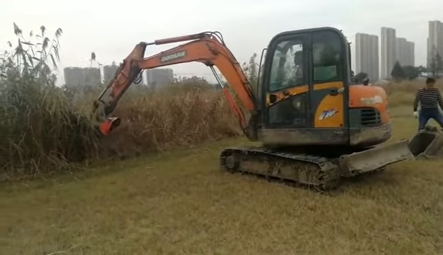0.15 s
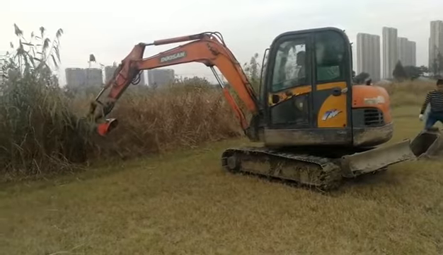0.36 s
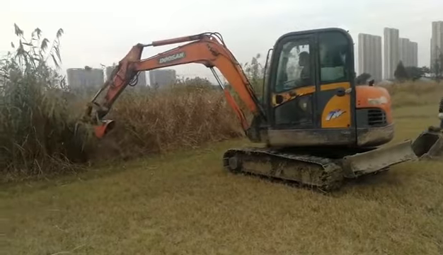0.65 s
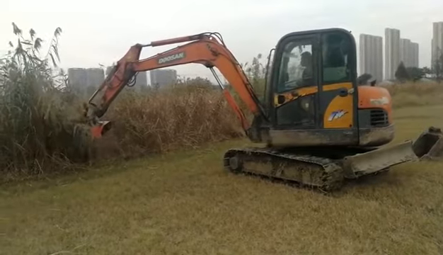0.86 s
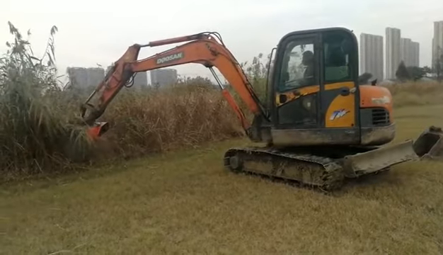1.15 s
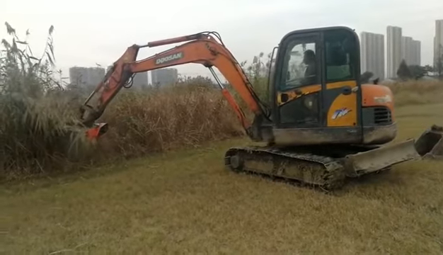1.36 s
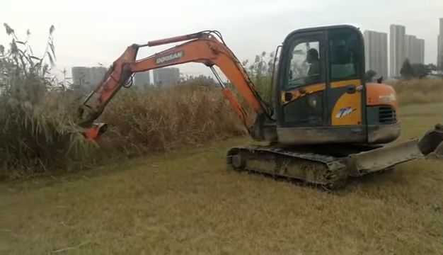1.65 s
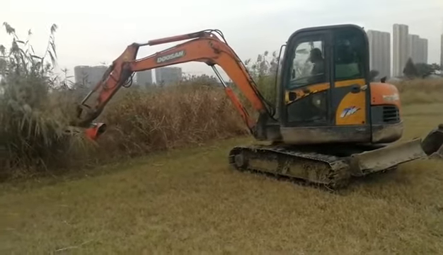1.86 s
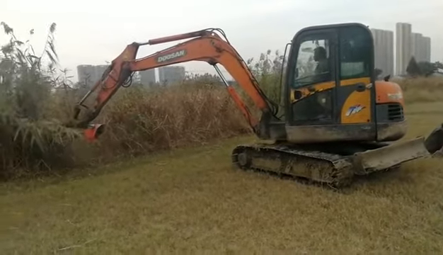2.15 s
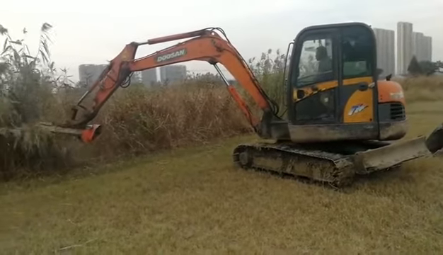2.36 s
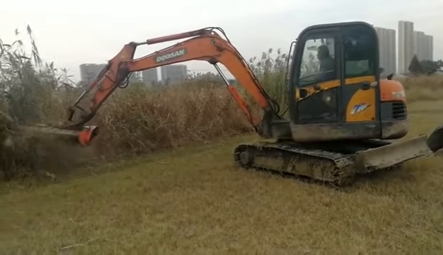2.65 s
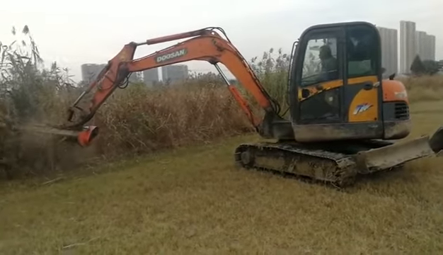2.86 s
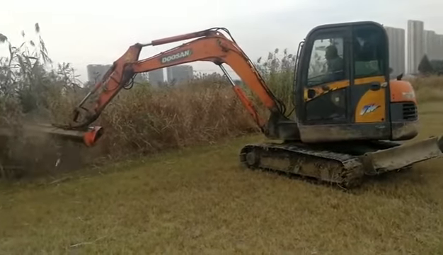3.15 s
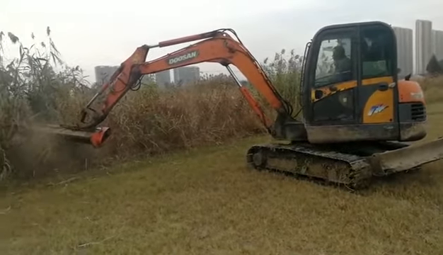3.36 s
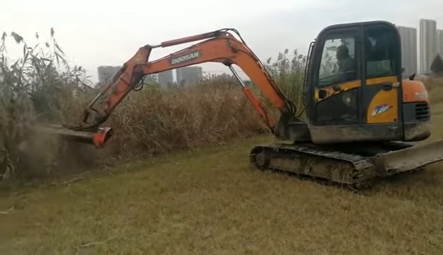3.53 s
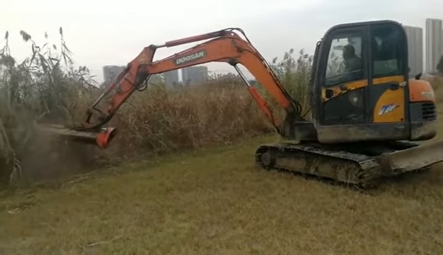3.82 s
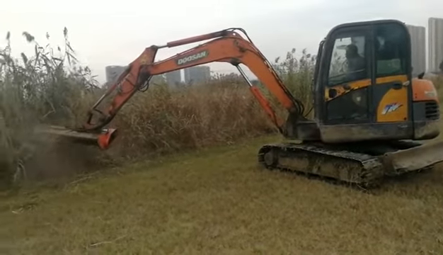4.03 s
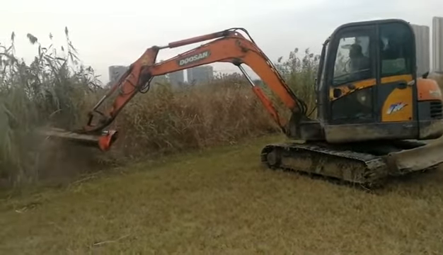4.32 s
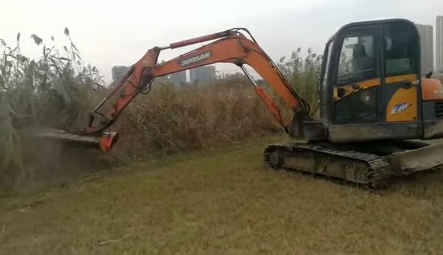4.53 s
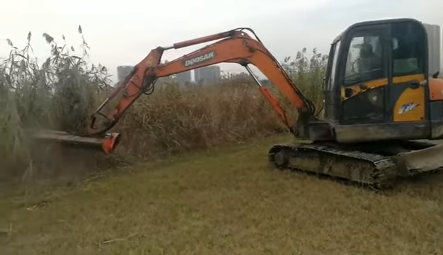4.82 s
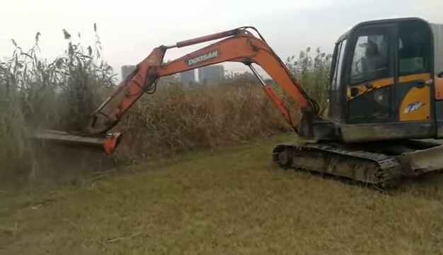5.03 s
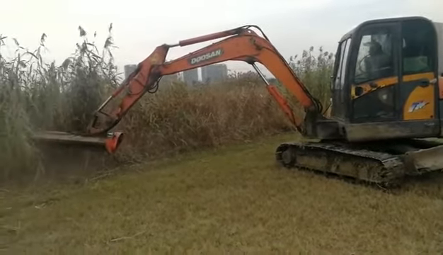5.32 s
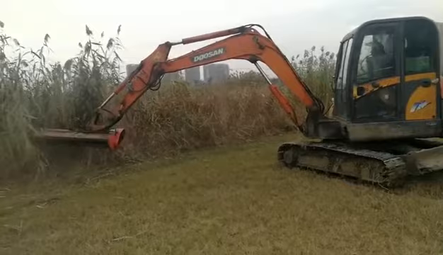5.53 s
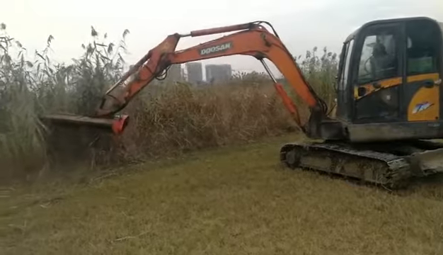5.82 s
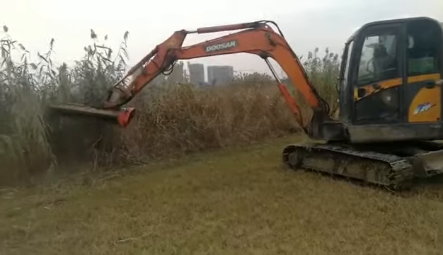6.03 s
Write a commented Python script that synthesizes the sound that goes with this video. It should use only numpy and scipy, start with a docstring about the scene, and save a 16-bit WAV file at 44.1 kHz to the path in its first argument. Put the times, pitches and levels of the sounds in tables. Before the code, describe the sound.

A small diesel excavator engine drones and clatters steadily while a spinning flail head shreds dry reeds with rushing crackle and sharp stem snaps.

```python
"""Excavator flailing reeds

A small diesel excavator works a flail head through tall reeds in an open field, heard from a phone some metres off.
The head, to the left, shreds stalks in dense sprays of filtered clicks; its drum rumbles, thick stems snap,
clods knock on the ringing hood and one stem squeals. The engine, to the right, drones in crank orders and
clatters as noise pulsed by each firing, while hydraulics whine in narrow bands and valves sing gliding tones."""
import sys
import numpy as np
from scipy import signal
from scipy.fft import rfft, irfft
from scipy.io import wavfile
from scipy.ndimage import map_coordinates

SR = 44100
rng = np.random.default_rng(int(sys.argv[2]) if len(sys.argv) > 2 else 0)


def unload_audio(sound):
    """Save the sound as a 16-bit wav file, at the path given as the first command line argument."""
    columns = np.transpose(np.atleast_2d(sound))
    # keep every value between -1 and 1, then stretch to whole-number steps
    steps = np.round(np.clip(columns, -1, 1) * 32767)
    wavfile.write(sys.argv[1], SR, steps.astype(np.int16))


N = 272538

# reeds fed into the head: (time [s], shredding level [dB])
REED_FEED = [(0.0, -34.5), (0.67, -33), (0.69, -38.5), (0.81, -33), (1.41, -38), (1.58, -36.5),
             (1.615, -42.5), (1.66, -36.5), (1.76, -33.5), (1.99, -34.5), (2.35, -30.5), (2.63, -29),
             (2.66, -31.5), (2.84, -34.5), (3.54, -31), (4.03, -32.5), (4.09, -34), (4.34, -34), (4.5, -32),
             (4.9, -38), (4.96, -35.5), (5.11, -40.5), (5.28, -39.5), (5.4, -41.5), (6.18, -47.5)]
USUAL_FEED_DB = -35
# phase by which the left port leads, bent by the body of the phone: (frequency [Hz], lead [rad])
HEAD_PHASE_LEAD = [(300, -1), (520, 2.8), (780, 2.16), (1200, 0.5), (1750, 2.5), (2800, 4), (3500, 3.5),
                   (4500, 7.5), (5100, 4.5), (6000, 8.5), (7400, 10.5)]
ENGINE_PHASE_LEAD = [(300, -1), (550, -0.2), (1150, -1.6), (1750, -2.5), (2650, -3), (3300, -6),
                     (4000, -7.5), (5000, -4.5), (7400, -10.5)]


def scene():
    """Flail head on the left, engine on the right, no walls to echo."""
    leaf_gain, stem_gain, rumble_gain, rattle_gain = head_load()
    cut = swung(shredding(leaf_gain, stem_gain) + snaps())
    head = cut + drum(rumble_gain, rattle_gain) + squeal()
    return head + engine() + hydraulics() + valves()


def head_load():
    """Gains of leaves, stems, rumble and hood rattle: all follow the uneven feed, and each wad adds a surge."""
    # wads of thick stems dragged through the drum: (start [s], length [s],
    # splintering level [dB], rumble level [dB], hood rattle level [dB])
    wads = [(0.133, 0.069, -72, -35.5, -52), (0.264, 0.031, -56, -63, -35),
            (1.085, 0.45, -66, -39.5, -50.5), (1.71, 0.18, -35, -31.5, -37), (2.046, 0.14, -28, -31, -38.5),
            (2.194, 0.077, -26.5, -33.5, -42.5), (2.282, 0.21, -27, -40, -50),
            (2.508, 0.13, -26.5, -44.5, -35.5), (2.655, 0.058, -48, -37, -68),
            (3.947, 0.091, -42, -32, -44), (4.392, 0.31, -58, -37, -53)]
    attack_s, release_s = 0.023, 0.019
    feed_db = curves(REED_FEED)[0] - USUAL_FEED_DB + 0.75 * walk(19)
    surges = 0
    for start, length, *db in wads:
        surges = surges + np.outer(undb(db), swell(start, length, attack_s, release_s))
    stem_surge, rumble_surge, rattle_surge = surges
    # level at the usual feed [dB] + follow [dB per dB] * feed
    leaves = undb(-31 + feed_db)
    stems = undb(-35.5 + 0.84 * feed_db)
    rumble = undb(-46 + 0.35 * feed_db + 1.9 * walk(16))
    rattle = undb(-43.5 + 0.41 * feed_db + 2.1 * walk(7.9))
    return (leaves, np.hypot(stems, stem_surge),
            np.hypot(rumble, rumble_surge), np.hypot(rattle, rattle_surge))


def shredding(leaf_gain, stem_gain):
    """Flails tear leaves and splinter stems in quick uneven bites, each a spray of fibre cracks."""
    # tearing leaves: (frequency [Hz], relative level per Hz [dB])
    leaf_colour = [(250, -25.5), (480, -19), (750, -10.5), (1050, 5.5), (1500, -12.5), (2200, 1.5),
                   (3100, 0.5), (4000, 6), (4600, 7), (5300, 8), (6200, 9), (7480, 11.5), (7700, -60.5)]
    # splintering stems: (frequency [Hz], relative level per Hz [dB])
    stem_colour = [(900, -33.5), (1700, -13), (2400, -6), (3100, -6), (3900, 2), (4600, -6), (5200, -5),
                   (7450, -10), (7750, -64)]
    bites = undb(0.59 * walk(24) + 0.69 * walk(320))
    leaf_grains = grains(rate=11000, spread_db=1.0) * bites
    stem_grains = grains(rate=12000, spread_db=0.9) * bites
    leaves = ports(leaf_grains, undb(over_hz(leaf_colour)), HEAD_PHASE_LEAD)
    stems = ports(stem_grains, undb(over_hz(stem_colour)), HEAD_PHASE_LEAD)
    leaves = patchy(leaves * leaf_gain, depth_db=3.0, rate=42)
    stems = patchy(stems * stem_gain, depth_db=4.0, rate=55)
    # stems break low and far to the left, so their shade is deeper
    return shaded(leaves) + shaded(stems, depth=2.33)


def patchy(pair, depth_db, rate):
    """Every stalk has its own pitch, so narrow bands flare and fade on their own."""
    hz, s, frames = signal.stft(pair, SR, nperseg=512)
    band = (hz / 260).astype(int)  # bands about 260 Hz wide
    flare = np.array([np.interp(s * rate, np.arange(1024), rng.standard_normal(1024))
                      for _ in range(band[-1] + 1)])
    return signal.istft(frames * undb(depth_db * flare[band]), SR)[1][:, :N]


def snaps():
    """Dry stems break: thick ones with a crack, thin ones with a bright tick."""
    # stems snapping: (time [s], level [dB], decay [s], brightness [0-1])
    breaks = [(.2437, -22, .0015, .2), (.3611, -22, .002, 0), (.6295, -22, .002, 0), (.6595, -24, .008, 1),
              (.6765, -22, .004, 1), (.7724, -20, .0015, 0), (.7868, -16, .002, 0), (1.877, -20, .002, 0),
              (2.268, -19, .002, 0), (2.392, -20, .002, .9), (2.5145, -19, .0015, 0),
              (2.5198, -18, .002, .1), (2.5255, -16, .004, .1), (2.5305, -13, .003, 0),
              (2.567, -19, .004, .15), (2.5735, -18, .0015, 0), (2.8504, -26, .002, 0),
              (4.1894, -22, .0015, 0), (4.237, -22, .0015, 0), (4.3755, -21, .002, .8),
              (4.4653, -23, .003, 0), (4.549, -21, .0015, .5), (4.8215, -25, .002, .9),
              (4.949, -26, .004, .6), (5.1933, -24, .002, .9), (5.2938, -15, .001, .4),
              (5.307, -20, .003, 1), (5.3338, -24, .002, 0), (5.3739, -25, .0015, .1),
              (5.593, -29, .003, 1), (5.6035, -23, .004, 1), (5.619, -29, .003, .9),
              (5.6375, -29, .002, .8), (5.649, -28, .002, .8), (5.7356, -26, .002, .2),
              (5.7655, -29, .004, .1), (5.872, -28, .004, .1), (5.892, -31, .009, .9),
              (6.0203, -28, .002, .8), (6.0315, -31, .004, 1)]
    # crack of a thick dry stem: (frequency [Hz], relative level per Hz [dB])
    crack_colour = [(600, -23), (2500, -5), (3900, 21.5), (5200, 12.5), (6500, -3.5), (7400, -8.5),
                    (7900, -51.5)]
    # tick of a thin stem: (frequency [Hz], relative level per Hz [dB])
    tick_colour = [(2500, -6), (5000, 12), (6600, 19.5), (7450, 21), (8100, 9), (9000, -11)]
    blows = [row[:3] for row in breaks]
    brightness = np.array([row[3] for row in breaks])
    thick = bursts(blows, 1 - brightness)
    thin = bursts(blows, brightness)
    crack = ports(grains(rate=22000, spread_db=-1.0), undb(over_hz(crack_colour)), HEAD_PHASE_LEAD)
    tick = ports(grains(rate=22000, spread_db=-1.0), undb(over_hz(tick_colour)), HEAD_PHASE_LEAD)
    return shaded(thick * crack + thin * tick)


def swung(pair):
    """The cut moves with the head and along the drum, so the port lag shifts and the treble hollow wanders."""
    # swing of the head: (time [s], extra lag of the right port [ms])
    swing = [(0, -0.00029), (1.2, -0.052), (2, 0.0017), (2.7, 0.019), (3.1, -0.002), (4.5, -.015),
             (6.18, -0.041)]
    lag_ms = curves(swing)[0] + 0.034 * walk(14)
    read_at = np.arange(N) - lag_ms * SR / 1000
    return np.array([pair[0], map_coordinates(pair[1], [read_at], mode="mirror")])


def drum(rumble_gain, rattle_gain):
    """The drum hums and churns the cut mass; chaff and clods stir now one mode of the steel hood, now another."""
    # flails passing the hood, faster as the load lets go: (time [s], rate [Hz])
    flail_rate = [(0, 195), (1.0, 178), (1.8, 190.3), (2.1, 182), (2.4, 205.4), (2.8, 213.3), (4.0, 211.4),
                  (4.8, 203), (5.3, 263.3), (6.18, 254)]
    # air in the hood: (frequency [Hz], half-width [Hz], level [dB])
    air_modes = [(172, 35, 3), (209.2, 15.8, 8), (313, 37, -6)]
    # steel hood: (frequency [Hz], half-width [Hz], level before weighting by the root of the width [dB])
    hood_modes = [(324, 50, -3), (663, 70, 1), (795, 60, 5), (895, 80, 5), (1038, 120, 0)]
    # clods and wads against the hood: (time [s], level [dB], decay [s])
    knocks = [(1.822, -42, 0.032), (2.52, -40, 0.028), (2.6232, -22.5, 0.0035), (2.6335, -20, 0.008),
              (2.80, -34, 0.03), (4.052, -32, 0.03)]
    churn = ports(rng.standard_normal((3, N)), resonances(air_modes), HEAD_PHASE_LEAD)
    # the drum speed wavers as wads drag on it
    flail_hz = curves(flail_rate)[0] * (1 + 0.04 * walk(30))
    hum = np.sin(2 * np.pi * np.cumsum(flail_hz) / SR)
    rumble = (undb(-7.0) * churn + undb(-5.0) * hum) * rumble_gain
    hood = 0
    for hz, half_width, db in hood_modes:
        chaff = grains(rate=3000, spread_db=1.0)
        ring = ports(chaff, resonances([(hz, half_width, 0)]), HEAD_PHASE_LEAD)
        hood = hood + ring * undb(db + walk(12)) * np.sqrt(half_width)
    blows = rattle_gain * undb(2.5 * walk(35)) + bursts(knocks)
    return rumble + shaded(unit(hood) * blows)


def squeal():
    """Stick and slip of a wet bent stem on the steel hood: a short rough whistle."""
    pitch_hz = 4930 * (1 + 0.033 * walk(500))
    tone = np.sin(2 * np.pi * np.cumsum(pitch_hz) / SR)
    tone = tone * undb(-37) * swell(start=2.68, length=0.085, attack=0.015, release=0.015)
    return shaded([tone, tone])


def engine():
    """Four cylinders: exhaust orders drone, the housing shakes, and each firing sets off a clatter in the block."""
    # governed speed; it speeds up and softens as the load lets go:
    # (time [s], firing rate [Hz], exhaust drone level before a 0.5 dB cut [dB])
    running = [(0.1, 99.9, -35.5), (1.3, 100.1, -36.8), (1.55, 99.5, -35.5), (1.85, 100.2, -37.5),
               (2.66, 100.2, -37.8), (2.93, 100.4, -36), (3.01, 100.2, -38.3), (4.86, 100.2, -38.3),
               (4.95, 101.3, -36.5), (5.08, 104.9, -42.5), (5.2, 104, -45.5), (5.31, 102.2, -42),
               (5.48, 99.9, -39.5), (5.61, 98.8, -35.5), (5.81, 98.4, -39), (6.08, 98.6, -36)]
    # exhaust drone: (multiple of the crank speed, level [dB], flutter [dB],
    # added gain once the machine has turned away [dB])
    orders = [(1.5, -24.5, 1.5, -5), (2, 0, 0.43, 1), (2.5, -22.5, 3, -2), (3, -16.5, 4.5, -1),
              (4, -16.5, 2.5, 2), (5, -19.5, 4.5, 6)]
    # the engine shakes its housing once a turn: (time [s], level of the sine's peak [dB])
    housing = [(0.0, -56), (0.15, -52), (0.21, -40), (0.69, -68), (1.07, -35.5), (1.56, -49), (1.98, -43),
               (2.58, -53), (2.99, -36.5), (3.85, -46.5), (6.06, -37.5), (6.18, -38)]
    # engine block, exhaust and fan: (frequency [Hz], relative level per Hz [dB])
    block_colour = [(20, -2), (32, -2), (42, -6), (65, 2), (130, -1.5), (250, -4.5), (380, -13.5),
                    (470, -10.5), (570, -4.5), (830, -15.5), (1130, -5), (1500, -5), (2500, -12.5),
                    (4500, -17), (7480, -12), (7800, -76.5)]
    # colour of the clatter once the machine has turned away: (frequency [Hz], gain [dB])
    turned_colour = [(200, -0.5), (290, 2.5), (400, -1), (800, 1.5), (1010, 1.5), (1130, -14.5),
                     (1280, -0.5), (1900, 0), (2600, 8.5), (3600, 6), (4800, -3.5), (7000, -8.5)]
    time = np.arange(N) / SR
    firing_hz, drone_db = curves(running)
    shake_db, = curves(housing)
    # two firings a turn
    crank = np.cumsum(firing_hz * (1 + 0.0027 * walk(13))) / (2 * SR)
    turned = np.clip((time - 5.13) / 0.65, 0, 1)

    drone = 0
    for multiple, db, flutter_db, turned_db in orders:
        level = np.sqrt(2) * undb(db + turned_db * turned + flutter_db * walk(13))
        cycles = np.round(2 * multiple) / 2 * crank + rng.random()
        drone = drone + level * np.sin(2 * np.pi * cycles)
    shake = undb(shake_db + 2.0 * walk(14)) * np.sin(2 * np.pi * crank)

    # the cylinders are a little unequal, so the clatter lopes once in two turns
    cylinder_db = np.array([0.43, 0.28, -0.22, -0.25])[(2 * crank).astype(int) % 4]
    firing_pulse = 1 + 0.5 * np.exp(-(2 * crank % 1) / 0.15)
    knock = firing_pulse * undb(cylinder_db + 1.0 * walk(15))
    clatter = ports(rng.standard_normal((3, N)) * knock, undb(over_hz(block_colour)), ENGINE_PHASE_LEAD)
    clatter = (1 - turned) * clatter + turned * colour(clatter, undb(over_hz(turned_colour)))

    # the cab screens the high clatter as the machine moves; the low boom bends round it
    boom = colour(clatter, 1 / (1 + (bins() / 800) ** 4))
    screened = np.clip((time - 2.06) / 0.48 + 0.5, 0, 1)
    high_clatter = undb(-35.5 - 3 * screened) * (clatter - boom)
    return drone * undb(drone_db - 0.5) + shake + undb(-35.5) * boom + high_clatter


def hydraulics():
    """Narrow wavering pump tones that swell with the load on the head."""
    # hydraulic whine: (frequency [Hz], width [Hz], level at the usual feed [dB])
    whine = [(553, 10, -55.5), (580.3, 20, -52), (691, 22, -53.5), (1008, 50, -50.5), (1282, 15, -54.5),
             (1429, 14, -59)]
    load_db = 0.17 * (curves(REED_FEED)[0] - USUAL_FEED_DB)
    out = 0
    for hz, width, db in whine:
        band = resonances([(hz, width / 2, 0)])
        tone = ports(rng.standard_normal((3, N)), band, ENGINE_PHASE_LEAD)
        out = out + undb(db + load_db + 1.5 * walk(4.4)) * tone
    return out


def valves():
    """Oil sings through a valve while the arm moves, gliding a little in pitch."""
    # valves singing: (start [s], length [s], frequency [Hz], peak level [dB], rise in pitch [share per s])
    songs = [(1.153, 0.53, 1260, -47, 0.0049), (1.241, 0.49, 676, -44.5, 0.059),
             (2.855, 0.32, 580, -49, 0.015), (3.449, 0.45, 703, -51, -0.06),
             (4.523, 0.27, 1003, -42, 0.083), (4.561, 0.31, 679, -45.5, 0.054),
             (5.102, 0.48, 997, -56, -0.038), (5.4, 0.72, 1276, -52, 0.014),
             (5.553, 0.63, 577, -51, 0.0253), (5.791, 0.35, 683, -52, 0.014)]
    time = np.arange(N) / SR
    out = 0
    for start, length, hz, db, rise in songs:
        glide = rise * np.clip(time - start, 0, length)
        pitch_hz = hz * (1 + glide + 0.019 * walk(70))
        tone = np.sin(2 * np.pi * np.cumsum(pitch_hz) / SR)
        out = out + undb(db + 1.1 * walk(20)) * swell(start, length, attack=0.17, release=0.059) * tone
    return out


def shaded(pair, depth=1):
    """The phone shades its right port from the head, so most of the spectrum is weaker there."""
    # shade at the right port: (frequency [Hz], gain at depth 1 [dB])
    shade = [(250, -2), (500, -4), (800, -9.5), (1400, 2), (2000, -2.5), (2600, 0), (3100, -3),
             (3900, -5.5), (4600, -5), (5400, -0.5), (7300, -7.5)]
    return np.array([pair[0], colour(pair[1], undb(depth * over_hz(shade)))])


def ports(streams, gain, lead):
    """One stream reaches both microphone ports with a phase lead; two more arrive scattered, one at each port."""
    # sound both ports have in common, the rest scattered by reeds and ground: (frequency [Hz], share [0-1])
    common = [(270, 1), (420, 0.52), (620, 0.32), (800, 0.5), (1300, 0.4), (1650, 0.45), (2000, 0.96),
              (2650, 1), (3400, 0.33), (7000, 0.2)]
    # waves longer than at 330 Hz wrap round the phone and reach both ports more and more alike
    apart = np.minimum(bins() / 330, 1) ** 3
    stray = apart * (1 - np.clip(over_hz(common), 0, 1))
    direct, *scattered = rfft(streams) * gain
    turn = np.exp(0.5j * np.outer([1, -1], apart * over_hz(lead)))
    spectra = np.sqrt(1 - stray) * direct * turn + np.sqrt(stray) * np.array(scattered)
    return unit(irfft(spectra, N))


def grains(rate, spread_db):
    """Three unrelated streams of tiny clicks of uneven strength, about rate of them a second."""
    hit = rng.random((3, N)) < rate / SR
    size = undb(spread_db * np.minimum(rng.exponential(size=(3, N)), 5))
    return unit(hit * size * rng.standard_normal((3, N)))


def bursts(rows, shares=1):
    """Envelope of (time [s], level [dB], decay [s]) blows by power share: quick rise, exponential fall."""
    out = np.zeros(N)
    for (s, db, decay), share in zip(rows, np.clip(shares, 0, 1) * np.ones(len(rows))):
        first = int(s * SR)
        age = np.arange(min(SR // 2, N - first)) / SR
        rise = 1 - np.exp(-age / 1e-4)
        fall = np.exp(-age / max(decay, 1e-4))
        out[first:first + len(age)] += undb(db) * np.sqrt(share) * fall * rise
    return out


def swell(start, length, attack, release):
    """Envelope that rises from start, holds until its length is over and falls; all in seconds."""
    age = np.arange(N) / SR - start
    return np.clip(age / attack, 0, 1) * np.clip(1 - (age - length) / release, 0, 1)


def walk(rate):
    """Smooth random wander of spread about 1, through rate random points a second."""
    knots = rng.standard_normal(4096)
    return 1.2 * np.interp(np.arange(N) / SR * rate, np.arange(len(knots)), knots)


def resonances(modes):
    """Response of damped (frequency [Hz], half-width [Hz], level [dB]) modes, steep outside their bands."""
    f = bins()
    return sum(undb(db) / (1 + 1j * (f * f - hz * hz) / (f * half_width * 2)) ** 2
               for hz, half_width, db in modes)


def colour(x, gain):
    """Filter by a gain per frequency."""
    return irfft(rfft(x) * gain, N)


def over_hz(points):
    """Join (frequency [Hz], value) points on a log-frequency axis."""
    hz, value = np.transpose(points)
    return np.interp(np.log(bins()), np.log(hz), value)


def bins():
    """Frequencies of the spectrum [Hz], kept at 1 or above."""
    return np.maximum(np.arange(N // 2 + 1) * SR / N, 1)


def curves(table):
    """Each column of a timed table, sample by sample."""
    s, *columns = np.transpose(table)
    return [np.interp(np.arange(N) / SR, s, c) for c in columns]


def unit(x):
    """Scale to rms 1."""
    return x / np.sqrt(np.mean(x ** 2))


def undb(db):
    """Decibels to gain."""
    return 10 ** (np.asarray(db) / 20)


def record(dry):
    """The phone cuts the top steeply above 8450 Hz."""
    low_pass = signal.ellip(12, 0.2, 80, 8450, fs=SR, output="sos")
    return signal.sosfilt(low_pass, dry)


dry = scene()
out = record(dry)
unload_audio(out)
```